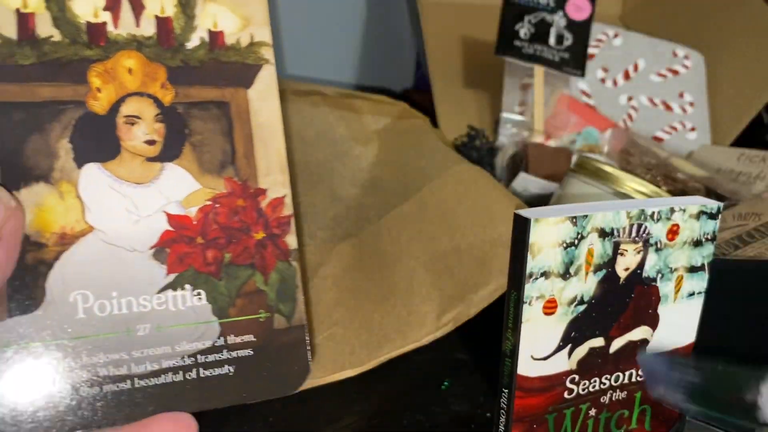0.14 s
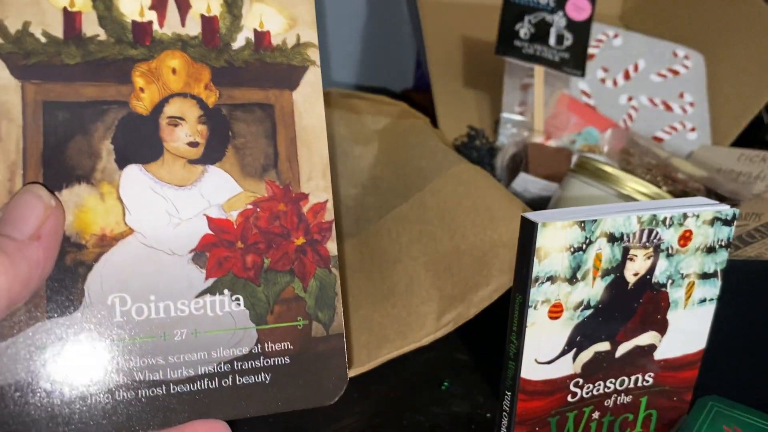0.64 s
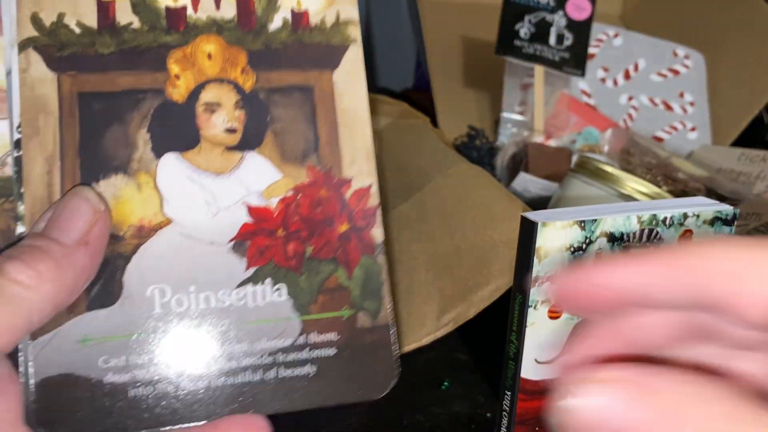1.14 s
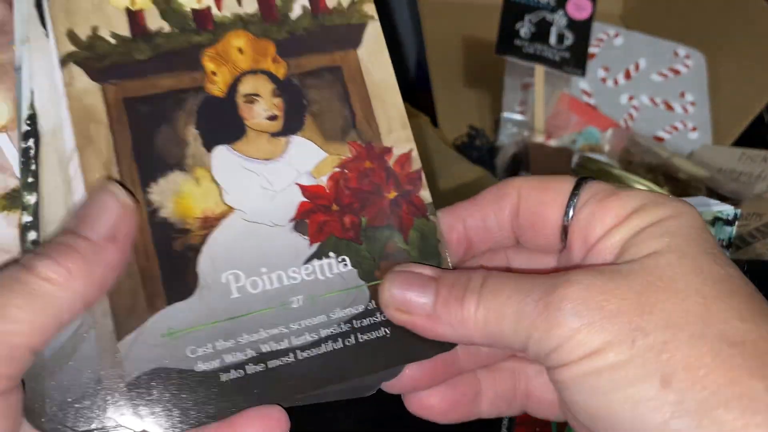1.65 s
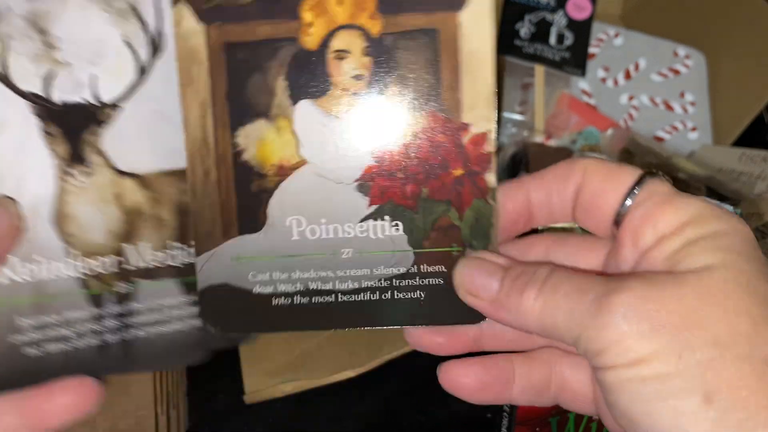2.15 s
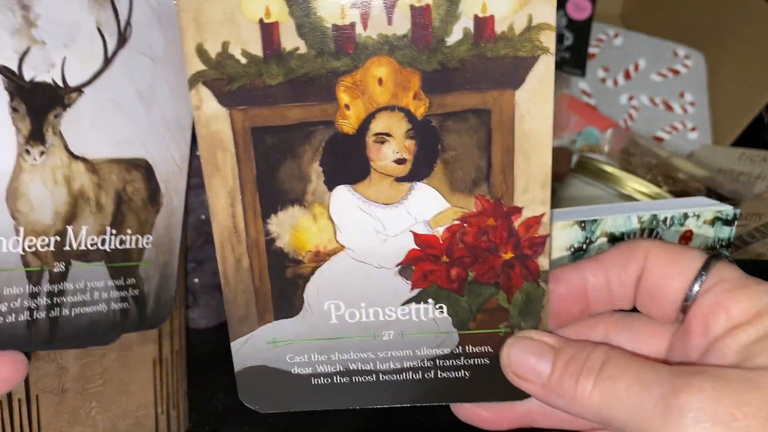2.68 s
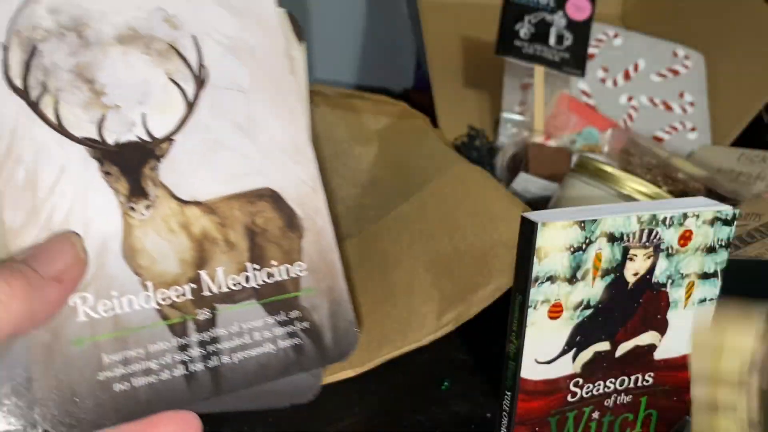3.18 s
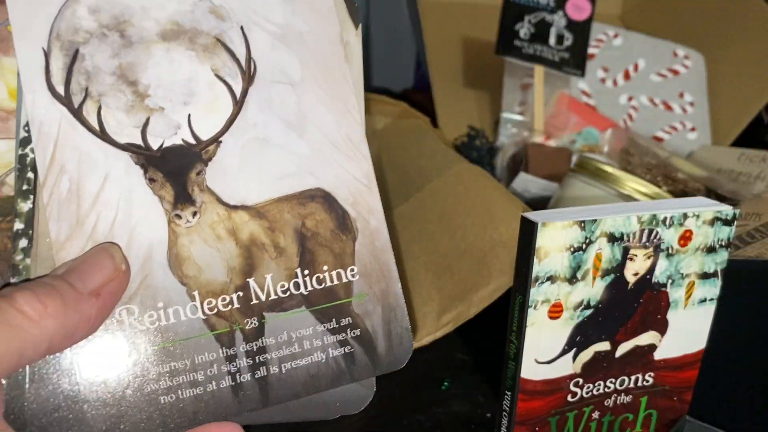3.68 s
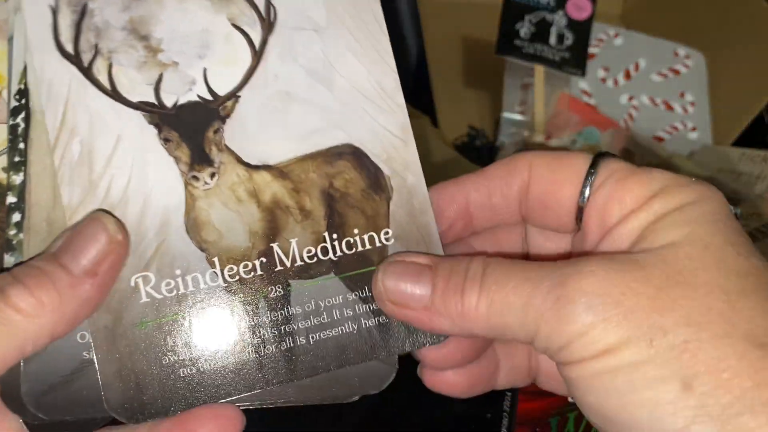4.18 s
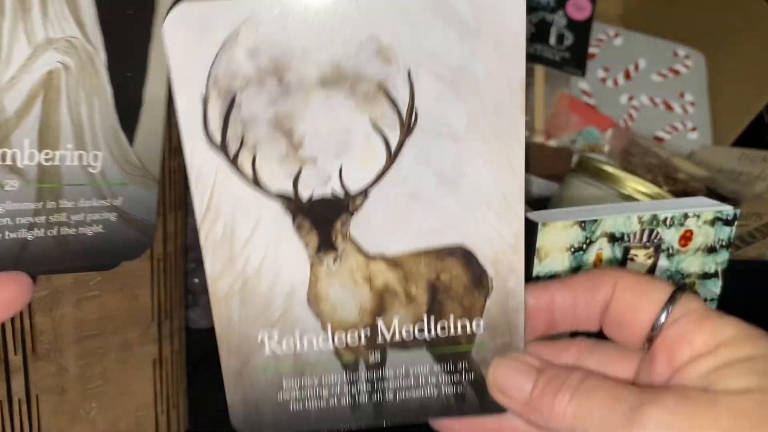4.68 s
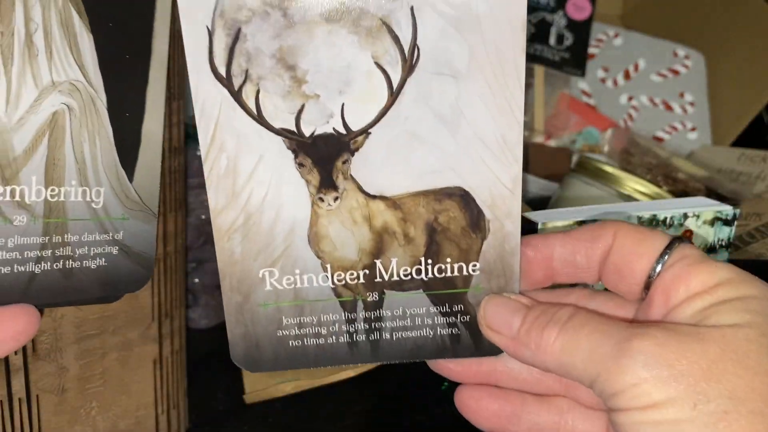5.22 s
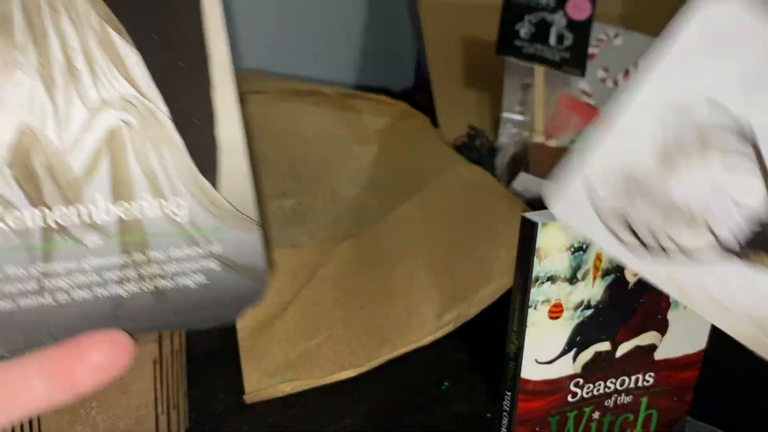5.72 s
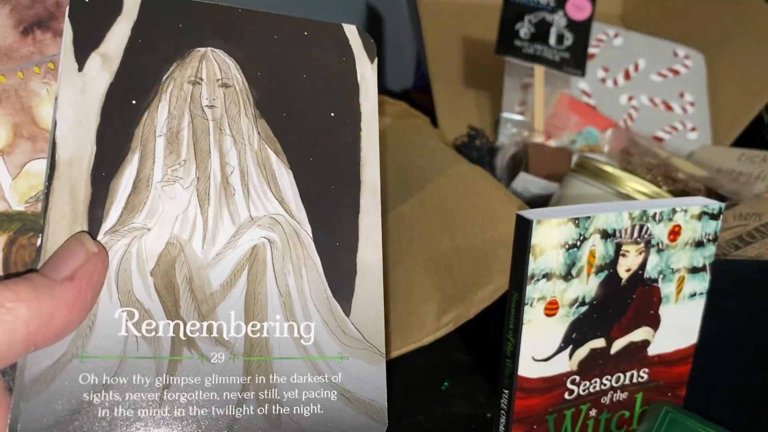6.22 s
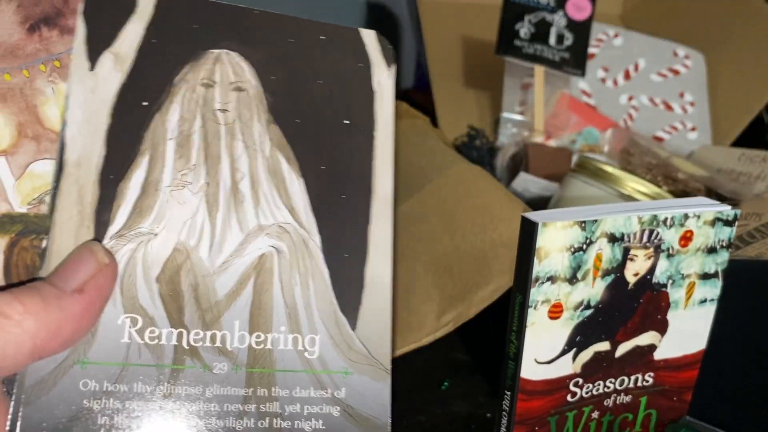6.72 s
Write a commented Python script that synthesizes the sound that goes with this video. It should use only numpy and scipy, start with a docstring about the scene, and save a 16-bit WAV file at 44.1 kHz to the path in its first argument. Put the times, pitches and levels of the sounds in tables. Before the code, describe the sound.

Close up in a quiet room, thick glossy cards are handled. A busy first second of snaps, ticks and low thuds gives way to faint rubbing and a soft pulled slide. Just after three seconds another card snaps and lands, then light slides follow, and near six seconds come more clicks, drags and thuds. A low hum lies underneath; the stereo pickup is close and the echo short.

```python
"""A quiet room, close to a small stereo microphone: stiff glossy cards are thumbed apart, slid off a deck
and dropped on a pile. Edges snap and tick as short blows that ring damped modes and crack the gloss;
landing cards thud on two low modes. Sliding faces drag and hiss as gritty noise shaped by each stroke.
A short echo follows the cards; a low hum, a deep drone and room tone are filtered noise."""
import sys
import numpy as np
from scipy import signal
from scipy.fft import rfft, irfft
from scipy.io import wavfile
from scipy.ndimage import uniform_filter1d

SR = 44100
rng = np.random.default_rng(int(sys.argv[2]) if len(sys.argv) > 2 else 0)


def int16_out(signal):
    """Quantize to a 16-bit WAV file."""
    q = np.round(np.clip(np.atleast_2d(signal).T, -1, 1) * 32767)
    wavfile.write(sys.argv[1], SR, q.astype(np.int16))


def makeup_ratio(level_db):
    """Linear amplitude ratio for a level in decibels (20 dB per factor of ten)."""
    decades = np.asarray(level_db, float) / 20
    return 10 ** decades


N = 302085  # samples


def evened(x):
    """Power normalization: scales a signal to rms 1."""
    return x / np.sqrt(np.mean(x ** 2) + 1e-20)


def peak_one(x):
    """Peak normalization: scales a signal to peak 1."""
    return x / abs(x).max()


def read(points, hz):
    """Logarithmic frequency scale: interpolates a table evenly per octave."""
    table_hz, value = np.transpose(points)
    return np.interp(np.log(hz + 1), np.log(table_hz + 1), value)


def follow(points, x):
    """Linear interpolation of a two-column table."""
    return np.interp(x, *np.transpose(points))


def shape(x, gain_at):
    """Linear filtering: multiplies the spectrum of the last axis by a complex gain given over Hz."""
    size = x.shape[-1]
    return irfft(rfft(x) * gain_at(np.fft.rfftfreq(size, 1 / SR)), size)


def mode(hz, centre_hz, width_hz):
    """Damped resonance: causal response of one mode, 1 at its centre."""
    damping = 1j * hz * width_hz
    return damping / (centre_hz ** 2 - hz ** 2 + damping)


# Colour of the room tone. Each row: frequency in Hz, relative level in dB.
ROOM_TONE_COLOUR = [(25, -29.5), (45, -13.5), (90, -12), (170, -26.5), (300, -28.5), (450, -41), (900, -58),
                    (2000, -61.5), (9000, -70.5), (16000, -87.5)]
# Wavering hum. Each row: centre in Hz, width of each of two cascaded resonances in Hz, rms level in dB.
HUM_BANDS = [(120.2, 22, -51.5), (223.3, 11, -69)]
# Deep drone that comes and goes. Each row: time in seconds, level in dB.
DRONE_LEVEL = [(0, -46.5), (2.0, -54), (2.9, -51), (3.651, -47.5), (3.85, -62), (5.3, -62.5), (6.85, -56.5)]


def background(room_tone_db=-55.5, apart=0.18):
    """Partly coherent field: room tone, wavering hum and deep drone are nearly alike at both ports."""
    def noise():
        return rng.standard_normal(N) + apart * rng.standard_normal((2, N))

    tone = shape(noise(), lambda hz: makeup_ratio(read(ROOM_TONE_COLOUR, hz)))
    out = makeup_ratio(room_tone_db) * evened(tone)
    for centre_hz, width_hz, db in HUM_BANDS:
        # a narrow band of noise wavers in strength
        out += makeup_ratio(db) * evened(shape(noise(), lambda hz: mode(hz, centre_hz, width_hz) ** 2))
    drone = evened(shape(noise(), lambda hz: mode(hz, 67, 21) ** 2))
    return out + drone * makeup_ratio(follow(DRONE_LEVEL, np.arange(N) / SR))


# Decay of the echo. Each row: frequency in Hz, time to fall by 60 dB in seconds.
ECHO_T60 = [(300, .25), (1000, 0.071), (3000, 0.2), (10000, 0.14)]


def echo(x):
    """Reverberant decay: sparse taps of random sign, each band dying at its own speed."""
    taps = np.zeros((2, SR // 2))
    slots = np.arange(130, SR // 2 - 20, 20)
    at = slots + rng.integers(0, 20, (2, len(slots)))
    np.put_along_axis(taps, at, rng.choice([-1., 1.], at.shape), 1)
    hz, t, z = signal.stft(taps, SR, nperseg=256)
    decay = makeup_ratio(-60 * t / read(ECHO_T60, hz)[:, None])
    tail = signal.istft(z * decay, SR, nperseg=256)[1]
    return signal.fftconvolve(x[None], tail / np.linalg.norm(tail[0]), axes=1)[:, :N]


# Phase between the ports. Each row: frequency in Hz, lead of the left port in radians.
PORT_LEAD = [(100, 0), (1460, -.7), (3190, .5), (6720, -.2), (7920, -2.1), (9730, -6), (11800, -9.3),
             (13700, -12.4), (16100, -15.7)]
# Balance of the ports. Each row: frequency in Hz, left minus right in dB.
PORT_COLOUR = [(150, -8), (600, 2), (1300, -5.5), (2500, 4), (5000, 4.5), (9000, 0.5), (14000, -0.5)]
# Where the hands are. Each row: time in seconds, left minus right in dB.
HAND_PLACE = [(0, -1.5), (2.099, 2), (3.2, -2), (4.402, 2.5), (5.7, -1.5), (6.85, -1)]


def ports(x):
    """Interaural-like differences: balance and treble delay part the two ports; long waves arrive alike."""
    pan_db = follow(HAND_PLACE, np.arange(N) / SR)
    low = shape(x, lambda hz: 1 / (1 + (hz / 250) ** 2))
    sides = []
    for half in (.5, -.5):  # left and right take half of each difference
        def colour(hz):
            return makeup_ratio(half * read(PORT_COLOUR, hz)) * np.exp(1j * half * read(PORT_LEAD, hz))

        sides.append(low + makeup_ratio(half * pan_db) * shape(x - low, colour))
    return np.array(sides)


# Bending modes of a card. Each row: centre in Hz, width in Hz, level in dB before the core damping.
CARD_MODES = [(439.3, 200, 2), (727, 170, 0), (1000, 310, -2.5), (1300, 500, -6), (1500, 240, -8.5),
              (1986, 380, -3.5), (2540, 700, -17), (3350, 440, -6), (4052, 240, -28.5)]


def card(hz):
    """Modal superposition: all bending modes of the card together; the paper core damps the treble."""
    modes = sum(makeup_ratio(db) * mode(hz, centre_hz, width_hz) for centre_hz, width_hz, db in CARD_MODES)
    return modes / (1 + 1j * hz / 4000) ** 2


# Colour of the coated faces. Each row: frequency in Hz, relative level in dB.
GLOSS_COLOUR = [(1800, -15.5), (3000, -6), (4500, -4.5), (6500, -6), (8500, -4), (10000, -4), (12000, -5),
                (14000, -13), (15500, -13), (16400, -35)]


def gloss(hz):
    """Contact radiation: the bright colour of coated faces touching."""
    return makeup_ratio(read(GLOSS_COLOUR, hz))


def grit(spread_db):
    """Stick-slip friction: noise whose strength changes every 1.5 ms, as contact catches and slips."""
    lumps = np.repeat(rng.exponential(1, N // 64 + 1), 64)[:N]
    lumps = np.minimum(uniform_filter1d(lumps, size=48), 3)
    return evened(rng.standard_normal(N) * makeup_ratio(spread_db * lumps))


def tinted(x, stroke_hz, lift_db, octaves, patchy_db):
    """Time-varying filtering: lifts a moving band and adds short random patches of uneven contact."""
    hz, t, z = signal.stft(x, SR, nperseg=256, noverlap=192)
    centre_hz = np.interp(t, np.arange(N) / SR, stroke_hz)
    lift = np.exp(-(np.log2((hz[:, None] + 1) / centre_hz) / octaves) ** 2)
    patches = uniform_filter1d(rng.standard_normal((len(t), len(hz))), size=10, axis=0)
    patches = evened(uniform_filter1d(patches, size=4, axis=1)).T
    z = z * makeup_ratio(lift_db * lift + patchy_db * patches)
    z /= np.sqrt(uniform_filter1d((abs(z) ** 2).sum(0), size=64))  # keep the running power even
    return evened(signal.istft(z, SR, nperseg=256, noverlap=192)[1][:N])


# In the three stroke tables each row: touch in seconds, length until parting in seconds,
# drag of the card body at full contact in dB, hiss of the gloss at full contact in dB.
# A card is pulled along another and gathers speed.
PULL_STROKES = [(0.152, 0.086, -68, -61), (0.192, 0.26, -47, -60), (0.786, 0.12, -35, -41.5),
                (1.021, 0.16, -78, -72), (1.155, 0.2, -66, -70.5), (1.824, 0.26, -74.5, -62.5),
                (2.01, 0.13, -56, -44), (2.777, 0.2, -73, -74), (3.398, 0.07, -39, -56.5),
                (4.035, 0.38, -69, -70.5), (4.251, 0.216, -67.5, -59.5), (4.335, 0.19, -50, -42.5),
                (4.465, 0.045, -38, -59), (5.482, 0.18, -70.5, -67.5), (5.898, 0.37, -55.5, -66.5),
                (6.563, 0.071, -87, -52)]
# A thumb or an edge rubs at even speed.
RUB_STROKES = [(.1, 0.14, -61, -88), (.46, 0.31, -60.5, -76), (.535, 0.074, -52, -59.5),
               (1.327, 0.116, -80.5, -67.5), (1.442, 0.052, -87.5, -72.5), (1.487, 0.14, -78.5, -61.5),
               (1.585, 0.067, -66.5, -59.5), (1.65, 0.25, -72, -65.5), (2.843, 0.0356, -61.5, -59.5),
               (2.897, 0.127, -74, -67.5), (3.1, 0.19, -81, -72.5), (3.206, 0.13, -38, -51),
               (3.253, 0.11, -47.5, -46.5), (3.368, 0.128, -42, -47), (3.478, 0.1034, -49.5, -78),
               (3.548, 0.13, -66, -70.5), (3.968, 0.14, -73.5, -64.5), (5.62, 0.13, -73, -74),
               (5.904, 0.072, -39.5, -56.5), (6.146, 0.088, -49.5, -50.5), (6.182, 0.062, -28, -62),
               (6.255, 0.14, -52.5, -62.5), (6.398, 0.081, -48.5, -57.5), (6.49, 0.072, -35, -47.5)]
# A flicked or dropped card skids to rest.
SKID_STROKES = [(.02, 0.069, -34.5, -51), (.285, 0.11, -56, -44), (.395, .14, -36.5, -56.5),
                (.685, 0.22, -81.5, -66), (.769, .075, -33.5, -56), (.868, 0.13, -40, -60),
                (2.992, 0.13, -72, -64), (3.842, 0.3, -77, -71.5), (4.5, 0.25, -62.5, -71.5),
                (5.706, 0.165, -85.5, -59.5), (5.816, 0.09, -37, -67), (6.553, 0.17, -51.5, -60),
                (6.687, 0.26, -52.5, -64)]


def strokes():
    """Kinematics of contact: touch, full speed, slowing and parting times, by the rule of each kind."""
    for touch, length, *db in PULL_STROKES:
        yield touch + length * np.array([0, 0.4, 0.4 + 0.23, 1]), db
    # rise in seconds, hold as a share of what remains
    for rows, rise_s, hold in ((RUB_STROKES, 0.0074, 0.53), (SKID_STROKES, 0.0023, 0.053)):
        for touch, length, *db in rows:
            slowing = rise_s + hold * (length - rise_s)
            yield touch + np.array([0, rise_s, slowing, length]), db


# How much card hangs free sets where the drag is lifted. Each row: time in seconds, frequency in Hz.
FREE_CARD_HZ = [(0, 1459), (.7, 1300), (.83, 1992), (1.06, 1981), (1.3, 1206), (2.08, 2230), (2.99, 2108),
                (3.2, 1300), (3.45, 1359), (3.5, 2148), (4.3, 2084), (4.36, 3396), (4.44, 3590),
                (4.47, 1916), (5.71, 2010), (5.93, 2212), (6.16, 1393)]
# Light touches hiss high, firm ones and the very faintest lower.
# Each row: drag in dB, centre of the lifted hiss in Hz.
HISS_HZ = [(-88, 4700), (-82.5, 21000), (-57, 3400)]


def slides(light_db=-21):
    """Friction-driven vibration: grit drives the card modes and, finer, the gloss in swelling strokes."""
    t = np.arange(N) / SR
    drag_power, hiss_power, firm = np.zeros(N), np.full(N, 1e-14), np.zeros(N)
    for (touch, full, slowing, parted), (drag_db, hiss_db) in strokes():
        ends = [touch, full, slowing, parted, 2 * parted - slowing]  # the last contact lingers
        stroke_db = np.interp(t, ends, [light_db, 0, 0, light_db, 2 * light_db], -200, -200)
        stroke_hiss = makeup_ratio(hiss_db + stroke_db) ** 2
        drag_power += makeup_ratio(drag_db + stroke_db) ** 2
        hiss_power += stroke_hiss
        firm += drag_db * stroke_hiss

    def level(power):
        return np.sqrt(abs(uniform_filter1d(power, size=200)))

    drag_hz = follow(FREE_CARD_HZ, t)
    hiss_hz = follow(HISS_HZ, firm / hiss_power)  # mean drag, weighted by hiss power
    drag = tinted(shape(grit(spread_db=2.2), card), drag_hz, lift_db=9.5, octaves=0.24, patchy_db=3.2)
    hiss = tinted(shape(grit(spread_db=1.5), gloss), hiss_hz, lift_db=2, octaves=1.0, patchy_db=3.0)
    return drag * level(drag_power) + hiss * level(hiss_power)


BLOW = 8192  # samples computed for each contact


def dying_noise(t60, rise_s=.001):
    """Exponential decay: noise that rises linearly and falls by 60 dB in t60 seconds."""
    t = np.arange(BLOW) / SR
    return rng.standard_normal(BLOW) * makeup_ratio(-60 * t / t60) * np.minimum(t / rise_s, 1)


def contact(first_blow=1.3, chatter_t60=0.018):
    """Impulsive excitation: one smooth blow 1 ms in, with a dying chatter."""
    t = np.arange(BLOW) / SR
    blow = first_blow * np.exp(-((t - .001) / 0.0001) ** 2)
    return blow + dying_noise(chatter_t60)


# A card lands flat on the pile. Each row: start in seconds, peak level in dB.
LANDINGS = [(0.021, -32), (0.046, -28), (0.401, -31), (0.415, -17.5), (0.431, -26), (0.787, -33.5),
            (0.852, -40), (.865, -22), (3.213, -28.5), (3.274, -26), (5.82, -25), (5.835, -25),
            (5.844, -30.5), (5.937, -34.5), (5.95, -34.5), (5.978, -39.5), (6.197, -22.5), (6.205, -23),
            (6.519, -31), (6.537, -30.5)]


def thuds():
    """Low-frequency resonance: each landing excites the modes of cards on a hollow table."""
    def pile(hz):
        return mode(hz, 210, 200) ** 2 + makeup_ratio(5.5) * mode(hz, 92, 33) ** 2

    out = np.zeros(N + BLOW)
    for s, db in LANDINGS:
        out[round(s * SR):][:BLOW] += makeup_ratio(db) * peak_one(shape(contact(), pile))
    return out[:N]


# Rings of edge snaps and ticks; a loud snap may take several rows. Each row: start in seconds,
# peak level of the ring in dB, bending ring in Hz, peak of the gloss crack in dB relative to the ring.
EDGE_SNAPS = [(0.021, -23.5, 2080, -3), (0.032, -28, 2200, -3), (.048, -34, 1420, 1),
              (0.078, -35, 1500, -17), (.232, -44, 1340, -12), (0.397, -15.5, 1150, -7.5),
              (.4093, -10, 1410, 3.5), (.411, -10, 490, -29.5), (.415, -10.5, 856, -24.5),
              (.42, -15.5, 1460, -27.5), (0.427, -18.5, 1800, -21.5), (0.512, -31.5, 695, -37),
              (0.631, -41.5, 1464, -22.5), (.693, -56.5, 3550, 12.5), (.775, -13.5, 1273, -5.5),
              (0.784, -33.5, 2030, -15), (0.801, -23.5, 1400, -3.5), (0.849, -14.5, 1410, -10),
              (0.8651, -7, 1940, -12.5), (.866, -7.5, 980, -30.5), (0.8665, -13.5, 2870, -25),
              (1.111, -65, 5920, 21), (1.248, -49.5, 5210, 10.5), (1.607, -43.5, 4230, 3.5),
              (1.671, -50, 870, -18.5), (2.319, -55, 693.6, 6.5), (2.993, -60.5, 5960, 38),
              (3.2114, -8, 1246, -31), (3.2123, -8.5, 1207, -25), (3.2133, -16, 2270, -32.5),
              (3.274, -14.5, 2090, -14.5), (3.277, -23, 720, -31), (3.339, -33, 4030, -14),
              (3.383, -28, 3030, -3), (3.485, -17, 2240, -10), (3.486, -15, 1580, -16),
              (3.542, -31.5, 647, -11.5), (3.87, -53.5, 5380, 13.5), (4.447, -35.5, 798, -20.5),
              (4.465, -36.5, 1000, -18), (5.712, -60.5, 5680, 30.5), (5.735, -37, 1687, -18),
              (5.751, -51, 3000, 6), (5.818, -14, 2230, -4.5), (5.835, -32, 2120, -4),
              (5.844, -21.5, 2250, -7), (5.98, -33.5, 1300, -6.5), (6.188, -24, 3170, 11),
              (6.2, -18.5, 1600, -16.5), (6.21, -16, 1590, -15.5), (6.215, -20, 1460, 2),
              (6.218, -17.5, 1620, -8.5), (6.222, -13, 1294, -8), (6.361, -48.5, 4200, 6.5),
              (6.402, -35.5, 1530, -35), (6.412, -34, 1300, -9), (6.487, -33.5, 1430, -10),
              (6.503, -24.5, 1600, -10), (6.508, -25, 2030, -7), (6.517, -13, 970, -15),
              (6.523, -13, 1300, -12.5), (6.53, -18, 1500, -18.5), (6.537, -18.5, 1235, -14),
              (6.683, -32.5, 1300, -3), (6.691, -19, 1300, -5)]
# Small ticks crack brighter. Each row: ring peak in dB, tilt added to the gloss in dB per octave.
TICK_TILT = [(-56.5, 13), (-46.5, -3), (-26, -1)]


def snaps(ring_width_hz=220, ring_loss_s=0.0001, card_share=0.36, low_cut=0.73,
          after_share=.3, after_narrow=0.23, crack_t60=0.014):
    """Impact excitation: each row's blow rings the bending card and cracks the gloss."""
    out = np.zeros(N + BLOW)
    for s, db, ring_hz, crack_db in EDGE_SNAPS:
        width_hz = ring_width_hz + ring_loss_s * ring_hz ** 2  # high bends die sooner

        def bending(hz):
            body = card_share * card(hz) * 1j * hz / (low_cut * ring_hz + 1j * hz)
            after_ring = after_share * mode(hz, ring_hz, after_narrow * width_hz)
            return body + mode(hz, ring_hz, width_hz) ** 2 + after_ring

        tilt_db = follow(TICK_TILT, db)
        ring = shape(contact(), bending)
        crack = shape(dying_noise(crack_t60), lambda hz: gloss(hz) * makeup_ratio(tilt_db * np.log2(hz + 1)))
        out[round(s * SR):][:BLOW] += makeup_ratio(db) * (peak_one(ring) + makeup_ratio(crack_db) * peak_one(crack))
    return out[:N]


def scene():
    """Superposition: hands and cards close by, their short echo, and the room."""
    cards = slides() + thuds() + snaps()
    alike, apart = echo(cards)
    # the echo differs between the ports mainly in the middle frequencies
    apart = shape(apart, lambda hz: hz / np.hypot(hz, 500) / np.hypot(1, hz / 6000))
    opposed = makeup_ratio(-7.5) * apart * [[1], [-1]]
    return ports(cards + makeup_ratio(-12.5) * alike) + opposed + background()


def top_cut(x):
    """Nothing passes above the cut-off."""
    return signal.sosfilt(signal.butter(12, 16520, fs=SR, output="sos"), x)


def record(dry):
    """Band limiting: a linear-phase low-pass at 16450 Hz finishes the mix."""
    edge = signal.firwin(511, 16450, window=("kaiser", 9), fs=SR)
    mix = signal.oaconvolve(dry, edge[None], "same")
    return top_cut(mix)


dry = scene()
out = record(dry)
int16_out(out)
```